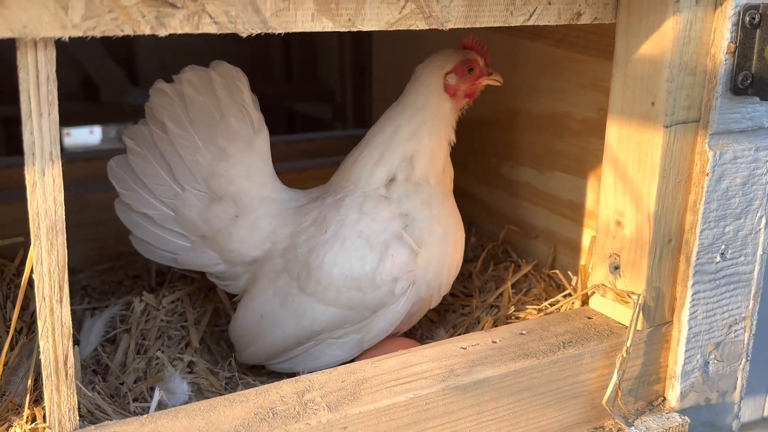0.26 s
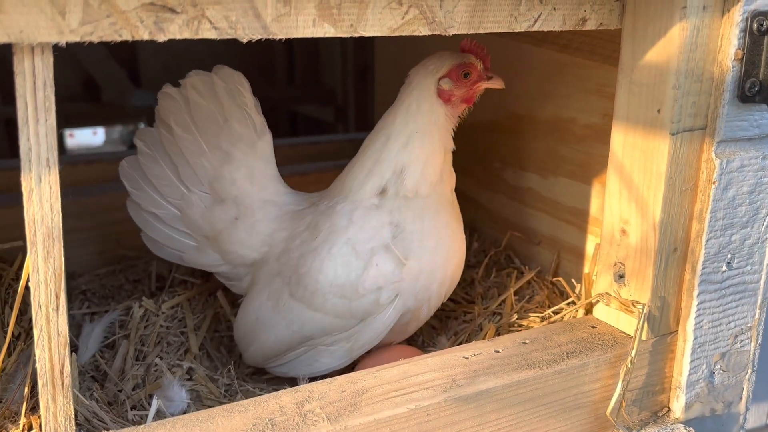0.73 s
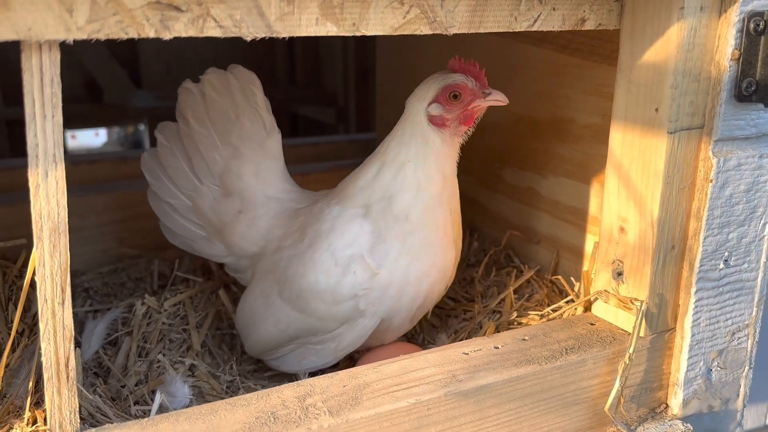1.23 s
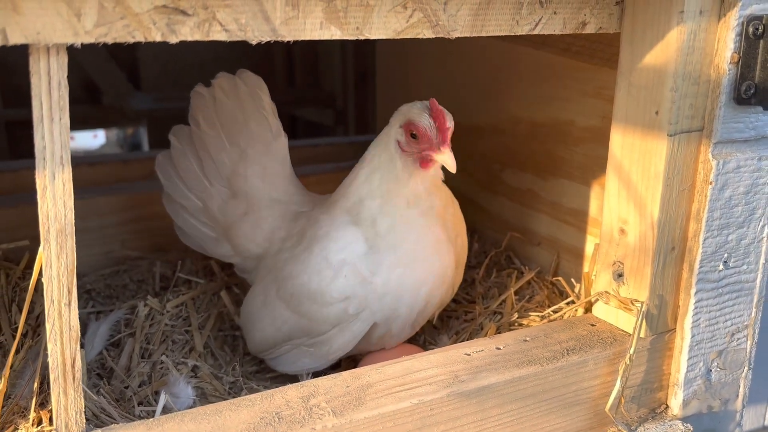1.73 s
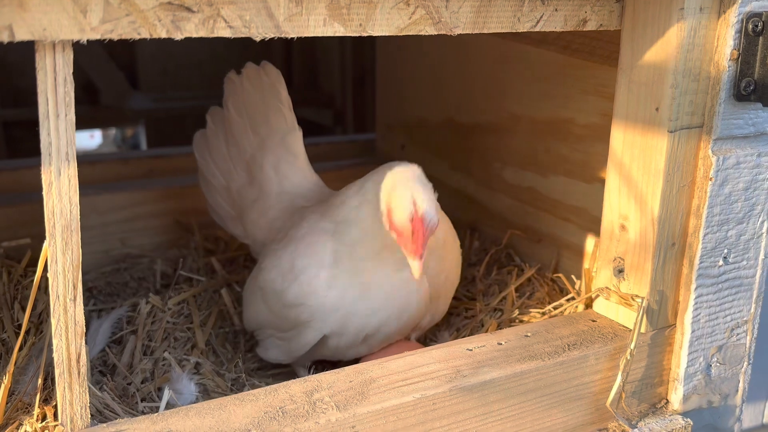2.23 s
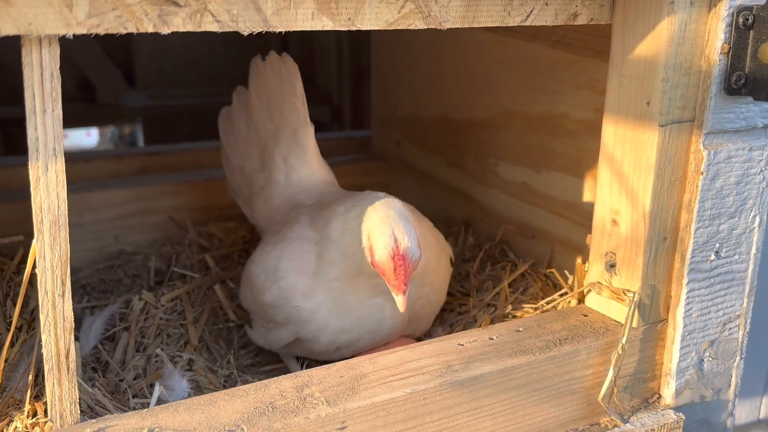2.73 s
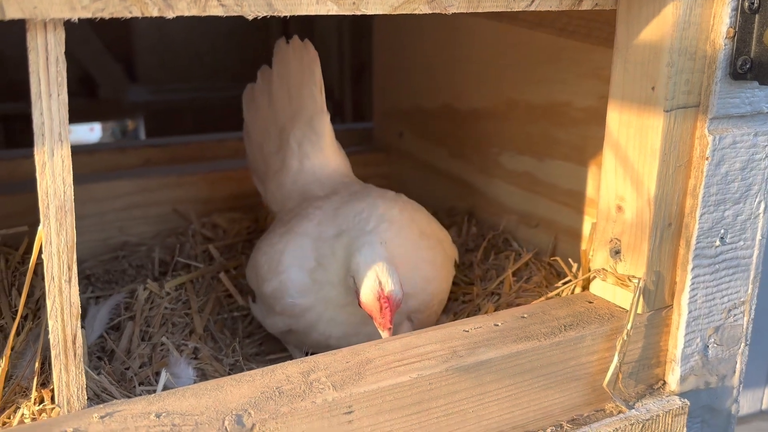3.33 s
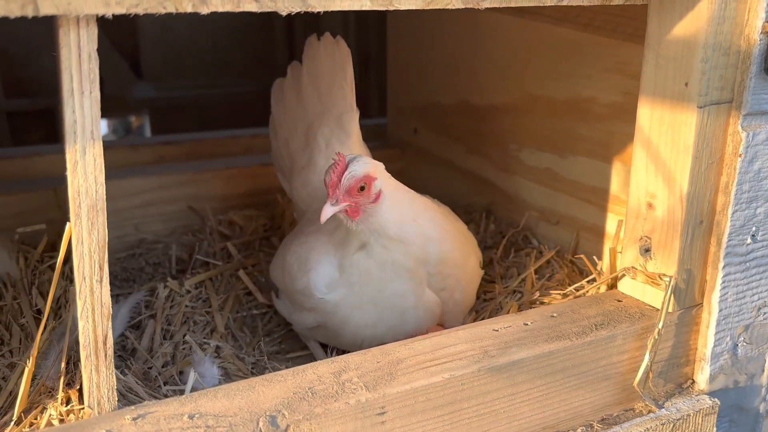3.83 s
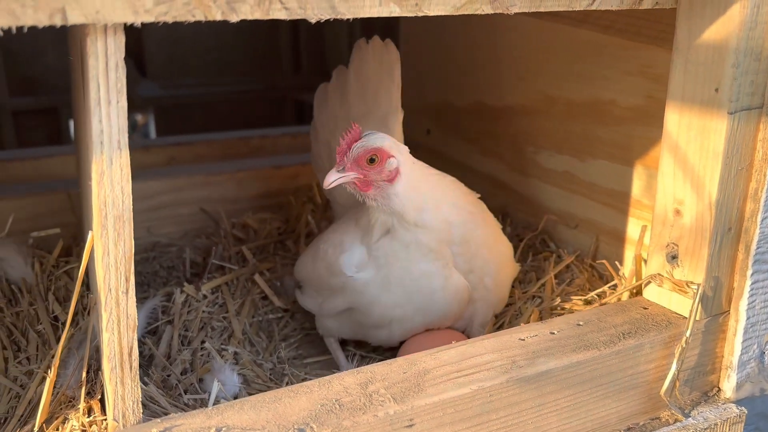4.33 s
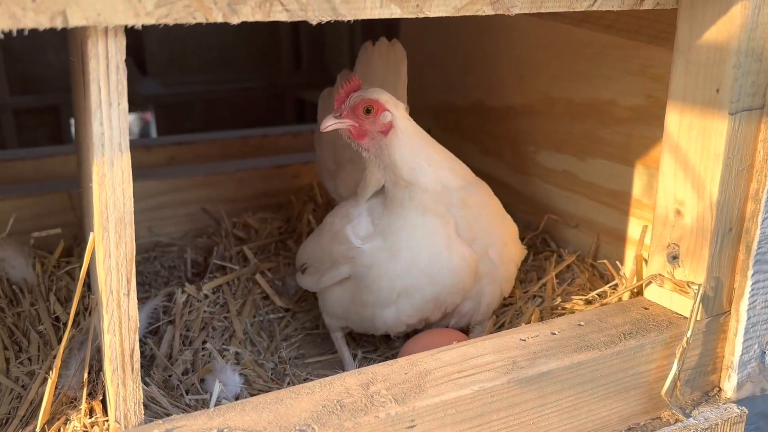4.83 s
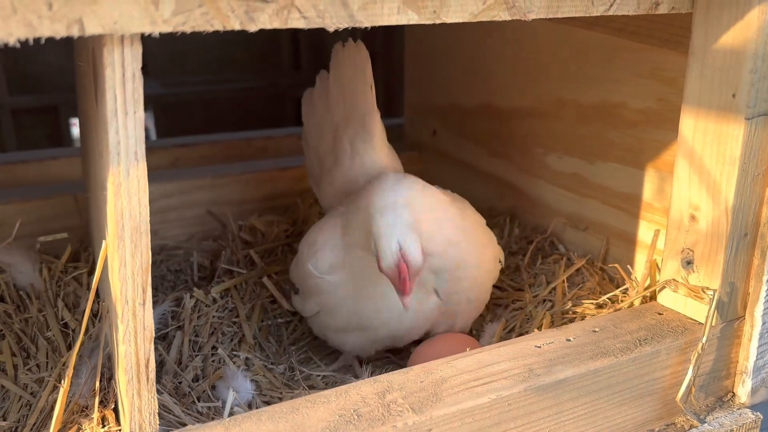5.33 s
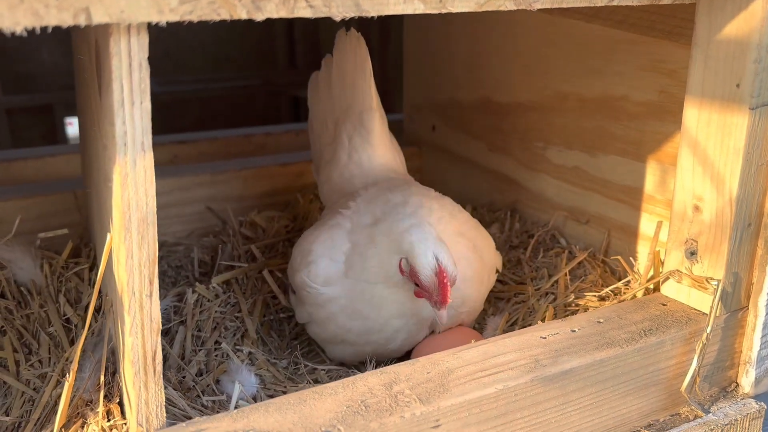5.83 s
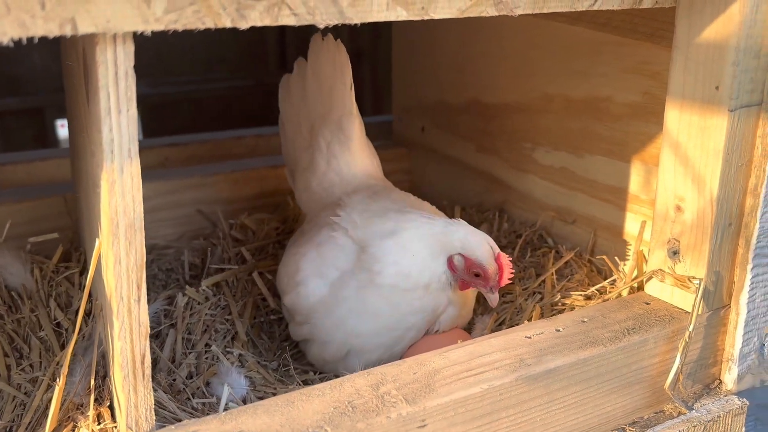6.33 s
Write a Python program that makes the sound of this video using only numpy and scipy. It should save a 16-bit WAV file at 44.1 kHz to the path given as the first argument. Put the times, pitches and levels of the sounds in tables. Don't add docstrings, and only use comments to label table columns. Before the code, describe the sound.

Close rhythmic hen clucks with two sharp ringing squawks, a second hen answering faintly from an echoing coop, then quieter, duller clucks and straw ticks.

```python
import sys
import numpy as np
from scipy import signal
from scipy.fft import rfft, irfft, next_fast_len
from scipy.io import wavfile
from scipy.ndimage import uniform_filter1d

SR = 44100
rng = np.random.default_rng(int(sys.argv[2]) if len(sys.argv) > 2 else 0)


def store_wav(level_fs):
    pcm = np.round(np.clip(np.atleast_2d(level_fs), -1, 1) * 32767)
    wavfile.write(sys.argv[1], SR, pcm.T.astype(np.int16))


def attenuation_scalar(level_db):
    decades = np.asarray(level_db, float) / 20
    return 10 ** decades


N = 289733

# time_s, effort_db, pitch_hz, beak_opening [factor on the throat], windpipe_dip_db
SQUAWK_A = [(0.813, -11, 1085, 0.92, 4.5), (0.836, -11, 1184, 1.07, 3), (0.872, -13, 1099, 1.2, 2.5),
            (.908, -16.5, 1037, 0.93, -7), (0.95, -15, 1053, 0.92, -10.5), (.98, -18, 1018, 1.16, 8.5),
            (1.0, -15, 1057, .92, -11), (1.034, -14.5, 1093, 1.22, 2.5), (1.058, -11.5, 1155, 1.1, 3)]
SQUAWK_B = [(3.886, -15.5, 1043, .96, 0.45), (3.9, -11, 1108, 0.99, 0.37), (3.931, -14.5, 1037, .93, .5),
            (3.963, -18.5, 1021, .82, .5), (3.984, -14.5, 983, 1.06, .5), (4.004, -17, 1008, .89, 0.54),
            (4.041, -14.5, 979.3, 1.045, .5), (4.078, -15, 1016, .86, 0.59),
            (4.093, -11.5, 1093, 1.067, 0.88)]
# frequency_hz, t60_s
COOP_T60 = [(300, 0.33), (1000, 0.36), (3500, 0.28), (6500, .24), (9000, 0.2), (14000, 0.13)]


def evened(x):
    return x / np.sqrt(np.mean(x ** 2) + 1e-20)


def read(points, hz):
    f, value = np.transpose(points)
    return np.interp(np.log(hz + 1), np.log(f + 1), value)


def resonance(f, centre_hz, width_hz):
    return 1 / (1 + ((f - centre_hz) / width_hz) ** 2)


def add(mix, s, sound):
    part = mix[..., round(s * SR):][..., :sound.shape[-1]]
    part += sound[..., :part.shape[-1]]


def wobble(size, width):
    *rows, length = np.atleast_1d(size)
    noise = rng.standard_normal((*rows, -(-length // 2400) * 2400))
    for _ in range(2):
        noise = uniform_filter1d(noise, round(width), axis=-1)
    return evened(noise)[..., :length]


def hiss(spectrum, same, size, patchy_db):
    hop = size // 4
    frames, hz = N // hop + 5, np.fft.rfftfreq(size, 1 / SR)
    a, b, c, d, patches = rng.standard_normal((frames, len(hz), 5)).T
    patches = evened(uniform_filter1d(uniform_filter1d(patches, 10, 0), 12, 1))
    same = np.clip(same(hz), -1, 1)[:, None]
    left = a + 1j * b
    right = same * left + np.sqrt(1 - same ** 2) * (c + 1j * d)
    z = np.array([left, right]) * attenuation_scalar(read(spectrum, hz)[:, None] + patchy_db * patches)
    return evened(signal.istft(z, nperseg=size, noverlap=size - hop)[1][:, :N])


def room(x, t60, gap_s):
    taps = np.zeros((2, SR // 2))
    slots = np.arange(round(gap_s * SR), SR // 2 - 20, 20)
    at = slots + rng.integers(0, 20, (2, len(slots)))
    np.put_along_axis(taps, at, rng.choice([-1., 1.], at.shape), 1)
    hz, t, z = signal.stft(taps, SR, nperseg=256)
    tail = signal.istft(z * attenuation_scalar(-60 * t / read(t60, hz)[:, None]), SR, nperseg=256)[1]
    return signal.fftconvolve(x[None], tail / np.linalg.norm(tail[0]), axes=1)[:, :N]


def ports(x, balance, lead):
    hz, side = np.fft.rfftfreq(x.shape[-1], 1 / SR), np.array([[.5], [-.5]])
    f, radians = np.transpose(lead)
    level = attenuation_scalar(side * read(balance, hz))
    phase = np.exp(1j * (side - .5) * np.interp(hz, f, radians))
    return irfft(rfft(x) * level * phase, x.shape[-1])


def syrinx(hz, half, rough, colour_db, bend=0.3, grain=0.):
    order = np.arange(1, 51)[:, None] / 2
    turns = np.cumsum(hz * (1 + .12 * rough * wobble(len(hz), 50.))) / SR
    between = order % 1 > 0
    gain = np.where(between, np.clip(half, 0, 1), 1.) * attenuation_scalar(colour_db(order * hz)) * (order * hz < 16300)
    rough = rough * (.7 + .12 * order + grain * order ** 2)
    shake = 1 + rough * (wobble(gain.shape, 45.) + 1j * wobble(gain.shape, 45.))
    shake = shake / (1 + 2 * rough ** 2) ** .4
    lag = bend * order ** 2 + 2 * np.pi * between * rng.random(order.shape)
    sound = (gain * shake * np.exp(2j * np.pi * order * turns - 1j * lag)).real.sum(0)
    return sound / np.sqrt((gain ** 2 * (1 + 2 * rough ** 2) ** .2).sum(0) / 2)


def outdoors():
    # frequency_hz, level_db
    air_spectrum = [(120, -16), (200, -5.5), (310, -12), (500, -9.5), (800, -3), (1250, -8), (1700, -19),
                    (2500, -24.5), (3200, -35), (4000, -33), (6000, -38), (9000, -46.5), (10500, -70),
                    (16000, -80)]
    # frequency_hz, likeness [-1 to 1]
    air_same = [(60, 1), (130, 0.13), (290, 1), (640, -0.034), (1410, -0.4), (3100, 0.29), (6820, -0.55),
                (15000, 0.48)]
    # frequency_hz, level_db
    rumble_spectrum = [(22, -42.5), (31, -26), (40, -14), (52, 8), (70, 5.5), (100, -2), (125, -5),
                       (170, -11.5), (260, -61.5)]
    # time_s, level_db
    rumble_db = [(0, -48), (1.4, -50), (2.4, -50), (3.9, -55), (4.6, -51), (5.4, -51.5), (6.57, -47)]
    # time_s, over_rumble_db
    puffs = [
        (5.671, 11.5),
        (6.038, 14.5),
        (6.209, 8),
    ]
    # frequency_hz, level_db
    hum_lines = [
        (100, -59),
        (200, -69.5),
    ]
    puff_s = 0.041
    t = np.arange(N) / SR
    air = attenuation_scalar(-51) * hiss(air_spectrum, lambda hz: read(air_same, hz), size=1024, patchy_db=.9)
    rumble = hiss(rumble_spectrum, lambda hz: .96 + 0 * hz, size=4096, patchy_db=-1.5)
    level_db = np.interp(t, *np.transpose(rumble_db))
    level_db = level_db + sum(db * np.exp(-((t - s) / puff_s) ** 2) for s, db in puffs)
    hum = sum(attenuation_scalar(db + 3.2 * wobble(N, 3000.)) * np.sqrt(2) * np.sin(2 * np.pi * hz * t) for hz, db in hum_lines)
    return air + (attenuation_scalar(level_db) * rumble + hum) * attenuation_scalar([[.4], [-.4]])


def bird():
    # start_s, length_s, top_hz, top_place [share of length], level_db
    whistles = [
        (1.72, .54, 8700, .43, -73),
        (5.16, .26, 9300, .6, -74.5),
        (5.6, .25, 7900, .3, -83),
    ]
    sag_hz_per_s2 = 17000
    dry = np.zeros(N)
    for s, length, top_hz, place, db in whistles:
        t = np.arange(0, length, 1 / SR)
        hz = top_hz - sag_hz_per_s2 * (t - place * length) ** 2
        turns = np.cumsum(hz * (1 + 0.0016 * wobble(len(t), 200.))) / SR
        level = attenuation_scalar(db + 4 * wobble(len(t), 300.)) * signal.windows.tukey(len(t), .12)
        add(dry, s, level * np.sin(2 * np.pi * turns))
    return dry + attenuation_scalar(-3) * room(dry, COOP_T60, .01)


def far_hen():
    # start_s, level_db, length_s, pitch_hz, roughness [0-1]
    calls = [(0.127, -45, .054, 965, .3), (0.312, -44, 0.046, 1104, 0.15), (0.533, -44, .04, 1012, 0.19),
             (1.162, -52.5, .05, 991, 0.48), (1.768, -55.5, 0.041, 1200, 0.21),
             (2.0, -56.5, .05, 1163, 0.27), (2.938, -50, 0.054, 1230, 0.25),
             (3.013, -42.5, .17, 1277, 0.46), (3.153, -45, 0.099, 1032, 0.37),
             (4.197, -47, 0.066, 1047, 0.17), (4.395, -43.5, .054, 1127, 0.28),
             (4.618, -44, .05, 1082, 0.22), (4.811, -44.5, 0.055, 1121, 0.33),
             (5.032, -41, .05, 1043, 0.27), (5.425, -43.5, 0.062, 954.6, 0.3)]
    # frequency_hz, height_db
    rings = [(3760, 7), (3320, 3), (4000, 3), (3970, -1), (3550, 7), (3480, 5), (3700, 7), (2550, 0),
             (2550, 7), (8500, 2), (6700, 5), (6500, 5), (4500, 8), (4000, 1.5), (3800, 4.5)]
    # frequency_hz, level_db
    short_throat = [(500, -11.5), (1100, 11.5), (2950, -17), (3300, 9.5), (3950, -0.5), (4400, -3.5),
                    (5400, -9.5), (6600, -7.5), (8500, -5.5), (10000, -19), (11300, -23), (14000, -14),
                    (16000, -13.5)]
    # frequency_hz, level_db
    wide_throat = [(500, -16), (1100, 8), (1900, -11.5), (2600, 4.5), (3100, 2), (3800, -2.5), (5200, -3),
                   (9300, -7.5), (10000, -29), (12000, -45), (16000, -57)]
    dry = np.zeros(N)
    for (s, db, length, hz, rough), (ring_hz, ring_db) in zip(calls, rings):
        u = np.arange(round(length * SR)) / (length * SR)
        throat = wide_throat if length > .08 else short_throat

        def colour_db(f):
            return read(throat, f) + ring_db * resonance(f, ring_hz, 250)
        arch = 1 - .3 * (u - .55) ** 2
        rasp = .6 * rough + .15 * np.exp(-u / .12)
        call = syrinx(hz * arch, .05 + 1.1 * rough, rasp, colour_db, grain=.05)
        rise = signal.windows.tukey(round(2 * len(u)), min(.7, .018 / length), sym=False)[:len(u)]
        shape = rise * np.cos(np.pi / 2 * u ** 3) * np.exp(-9 * length * u - .2 * u)
        add(dry, s - .011, attenuation_scalar(db + 3.5) * call * shape)
    return attenuation_scalar([[-1.5], [-4.5]]) * dry + attenuation_scalar(-5) * room(dry, COOP_T60, .006)


def straw():
    # time_s, peak_db
    ticks = [
        (3.43, -55),
        (3.651, -60),
        (5.6228, -59.5),
        (5.8624, -49),
        (5.952, -65),
        (6.0656, -47),
        (6.128, -59),
        (6.4638, -59),
    ]
    # frequency_hz, width_hz, level_db
    modes = [
        (8840, 300, -7.5),
        (14370, 2100, 4),
    ]
    t, out = np.arange(200) / SR, np.zeros(N)
    tick = sum(attenuation_scalar(db) * np.exp(-np.pi * width * t) * np.sin(2 * np.pi * hz * t) for hz, width, db in modes)
    for s, db in ticks:
        add(out, s, attenuation_scalar(db + 7) * tick)
    return out


def rustle():
    # frequency_hz, level_db
    feathers = [(2500, -19), (4000, 1.5), (8500, 14), (10000, 12.5), (14000, 10), (16000, 9)]
    start_s, rise_s, top_db, fade_db_per_s = 4.74, .11, -58, 20
    t = np.arange(N) / SR - start_s
    level = np.clip(t / rise_s, 0, 1) ** 3 * attenuation_scalar(top_db - fade_db_per_s * t + 2.5 * wobble(N, 500.))
    return level * hiss(feathers, lambda hz: 0.27 + 0 * hz, size=256, patchy_db=2)


def breath():
    # frequency_hz, under_voice_db
    breath_a = [(1500, -62), (2600, -66.5), (3600, -80), (5500, -60), (7500, -62), (9000, -49.5),
                (13500, -55.5), (16000, -61.5)]
    breath_b = [(1500, -65.5), (2600, -54), (3600, -58.5), (5500, -59.5), (7900, -85), (9000, -60.5),
                (13500, -61.5), (16000, -64)]
    t, hz, out = np.arange(N) / SR, np.fft.rfftfreq(N, 1 / SR), 0
    air = rfft(hiss([(1, 0), (2, 0)], lambda hz: .9 + 0 * hz, size=256, patchy_db=3))
    for rows, colour in (SQUAWK_A, breath_a), (SQUAWK_B, breath_b):
        s, effort_db = np.transpose(rows)[:2]
        level = attenuation_scalar(23 + np.interp(t, s, effort_db)) * (t > s[0]) * (t < s[-1])
        out = out + uniform_filter1d(level, 300) * irfft(air * attenuation_scalar(read(colour, hz)), N)
    return out


def cluck(hz, half, length, treble_db, mouth_hz, mouth_db, scoop, rasp, chest_db, early_half,
          tongue_hz, tongue_db, top_db, rise_share):
    # frequency_hz, level_db
    throat = [(280, -15.5), (440, 2.5), (900, -3.5), (1600, -1.5), (2500, -11), (3000, -14.5), (3900, 0),
              (5000, -9), (6000, -13.5), (8500, -20.5), (10000, -15), (11300, -17), (13500, -26),
              (16000, -31.5)]
    u = np.arange(round(length * SR)) / (length * SR)
    peak_place, sag_per_s = .55, 35
    before, after = np.maximum(1 - u / peak_place, 0), np.maximum(u - peak_place, 0)
    arch = 1 - scoop * before ** 2.6 - sag_per_s * max(length - .012, 0) * after ** 2
    start, end = np.exp(-(u / 0.33) ** 2), np.exp(-((1 - u) / 0.17) ** 2)
    shut = np.cos(np.pi * u) ** 4
    rough = .025 + .5 * half * (1 - half) + rasp * (start + 1.4 * end)
    uneven_db = np.linspace(1.2, 9, 50)[:, None] * wobble((50, len(u)), 350.)

    def colour_db(f):
        mouth_width_hz = 250 * (mouth_hz / 1500) ** 0.7
        db = read(throat, f) + uneven_db
        db = db + mouth_db * resonance(f, mouth_hz, mouth_width_hz) * (1 - 0.49 * shut)
        db = db + chest_db / (1 + (f / 950) ** 6)
        db = db + tongue_db * resonance(f, tongue_hz, 220)
        db = db + top_db * (f > 11500) + 5 * resonance(f, 13600, 600)
        db = db + 3.2 * shut * resonance(f, 1250, 220)
        db = db + 10 * start * resonance(f, 460, 140)
        db = db + (treble_db + 15.5 - 15 * shut - 6 * start) * np.clip((f - 2700) / 500, 0, 1)
        return db - 3 * end * np.log2(f / 800)
    rise = 1 - np.exp(-(u / rise_share) ** 1.3)
    shape = rise * (0.5 + 0.38 * np.sin(np.pi * u ** 1.24) ** 2) * (1 - np.exp((u - 1) / 0.16))
    return shape * syrinx(hz * arch, half + early_half * start, rough, colour_db, bend=0.038, grain=0.011)


def squawk(rows, throat, skull, settle_s, shift, collapse_s):
    scoop_s = .015
    s, *columns = np.transpose(rows)
    t = np.arange(s[0] - scoop_s, s[-1] + collapse_s, 1 / SR)
    early, late = np.maximum(s[0] - t, 0) / scoop_s, np.maximum(t - s[-1], 0) / collapse_s
    effort_db, hz, beak, dip_db = (np.interp(t, s, c) for c in columns)
    effort_db = effort_db - 19 * early - 17 * late ** 0.87 - 12 * late ** 8
    hz = hz * (1 - 0.28 * early - 0.42 * late ** 0.85)
    effort_db, hz, beak = uniform_filter1d([effort_db, hz, beak], 150, mode="nearest")
    hz = hz * (1 + .005 * wobble(len(t), 260.))
    rough = .009 + .2 * np.exp(-((t - t[0]) / settle_s) ** 1.5)
    rough = rough + .03 * np.exp((np.minimum(t, s[-1]) - s[-1]) / .012) + .2 * np.clip(late / .4, 0, 1)
    drift_db = np.minimum(.9 * np.sqrt(np.arange(50)), 3.5)[:, None] * wobble((50, len(t)), 650.)

    def colour_db(f):
        db = read(throat, f / (1 + shift * (beak - 1))) + drift_db
        db = db - 38.5 * (beak - 1) * resonance(f, 2100, 500)
        db = db + sum(height_db * resonance(f, at_hz, width) for at_hz, width, height_db in skull)
        db = db + 1.06 * np.maximum(effort_db + 15.5, -4) * resonance(f, 9000, 700)
        db = db + dip_db * resonance(f, 3220, 450)
        return db - (0.55 * late + .6 * early) * np.log2(f / 1000)
    voice = syrinx(hz, .005 + .7 * (rough - .009), rough, colour_db, bend=.06, grain=.06)
    return t[0], attenuation_scalar(effort_db) * voice


def hen():
    # start_s, peak_db, length_s, top_pitch_hz, strong_weak_share [0-1]
    clucks = [(0.035, -14, 0.037, 715.6, .2), (0.242, -15, 0.047, 762.5, 0.7),
              (0.467, -14.5, 0.048, 824.7, 0), (0.684, -13.5, 0.054, 834.4, 0.1),
              (0.795, -12, 0.015, 1143, 0), (1.312, -6, 0.038, 874.4, 0.12),
              (1.632, -10, 0.037, 805.3, 0.1), (1.901, -12, 0.039, 752.5, 0.52),
              (2.156, -15, 0.038, 715.5, 1), (2.39, -14.5, 0.038, 765.7, 0.2),
              (2.624, -15, 0.036, 743, 0.9), (2.88, -18, 0.036, 687.4, 0.8),
              (3.099, -20, 0.051, 827.5, .25), (3.333, -20, 0.05, 839.7, 0.24),
              (3.553, -19.5, 0.043, 802, 0.1), (3.764, -15.5, .042, 810, 0.09),
              (3.873, -10.5, 0.011, 1116, 0), (4.603, -18.5, 0.032, 615, 0.5),
              (5.311, -21.5, 0.028, 572.4, 0.22), (5.554, -19, .025, 637.7, 0.04),
              (5.948, -24, 0.0154, 560, 0.43), (6.185, -17.5, 0.027, 603.7, 0.12),
              (6.431, -17.5, 0.028, 609.3, 0.14)]
    # treble_db, mouth_hz, mouth_db, left_right_db
    heads = [(-21.5, 1500, 19, 4), (-19.5, 1300, 22, 3), (-25.5, 970, 9.5, 2), (-23, 3300, 4.5, 2.5),
             (-21.5, 1500, 12.5, 3.5), (-19, 1700, 10.5, 3), (-20.5, 1580, 12, 4.5), (-18, 1450, 15, 6),
             (-22.5, 2700, 12, 5), (-22.5, 1534, 8.5, 5), (-18, 1500, 13, 6), (-19.5, 1400, 11, 4),
             (-28, 2300, 8, 5), (-24, 2100, 13, 4.5), (-22, 1800, 2, 6), (-20.5, 3200, 13.5, 6),
             (-3.5, 1300, 26, 4.5), (-24, 1300, 18, 7), (-38.5, 2270, 4.5, 5), (-39.5, 2320, 14.5, 3.5),
             (-43, 1600, 9, 4.5), (-45.5, 1850, 3, 4.5), (-42.5, 1850, 5.5, 2.5)]
    # scoop [share of pitch], rasp [0-1], chest_db, early_strong_weak [share]
    breaks = [(0.57, 0, -0.5, 0.23), (.2, 0.3, 3.5, .5), (0.65, 0.06, -13, 0.11), (0.38, 0.4, -5, 0.11),
              (0.051, .4, -3.5, 0.22), (0.37, 0.3, -9, .05), (.45, 0.1, -5, .05), (0.68, 0.4, -3, 0.22),
              (0.9, 0, -7, 0.26), (0.15, 1, -4, 0.14), (0.61, 0.3, -4.5, .3), (0.62, 0, -3.5, 0.24),
              (.38, .4, -4, .2), (.32, .42, -4, .15), (.4, .4, -5, .15), (.4, .35, -5, .15),
              (.05, .25, -4, .05), (.25, .3, -3, .5), (0.2, 0.52, -1.5, 0.18), (0.31, 0.3, -1.5, .1),
              (0.36, 0.5, 1, .2), (0.2, 0.02, -9.5, .1), (.15, 0, -7.5, 0.084)]
    # tongue_hz, tongue_db, top_treble_db, rise [share of length]
    tongues = [(3860, 11, -1, 0.081), (1860, 3.5, -8.5, .09), (3900, 6.5, -6.5, 0.057), (1650, 4, -2.5, .1),
               (2200, 3, 0, .08), (4300, -1.5, -1, 0.095), (2420, -0.5, 2.5, 0.15), (1720, 5, 2, .1),
               (1380, 9.5, 3, .06), (2650, 7.5, -1, .12), (1880, 6.5, 1.5, 0.087), (1750, 0.5, 0, 0.09),
               (1650, -2.5, 3, 0.056), (1683, -3, 1, 0.037), (2400, 4.5, 1.5, .07), (1400, 4.5, 1.5, 0.023),
               (2100, -2.5, 0, .15), (2100, 2.5, -12, 0.036), (1790, 2, 6, 0.034), (1850, -1.5, 3, 0.081),
               (1750, -8.5, 0, 0.024), (1200, 0, -14, 0.064), (1200, -0.5, -6, 0.082)]
    # frequency_hz, level_db
    open_a = [(500, -27.5), (1070, -3.5), (2140, -5.5), (3200, -29), (4300, -16), (5350, -25), (6400, -23),
              (7500, -32.5), (8800, -27), (9700, -26.5), (10600, -20), (12800, -18), (14500, -33),
              (16300, -47.5)]
    open_b = [(500, -38), (1020, -5.5), (2040, -8), (3050, -14.5), (4080, -6), (5100, -23.5), (6100, -27),
              (7100, -19), (8100, -24), (9200, -22), (10200, -25), (11500, -12.5), (13300, -28.5),
              (15500, -26)]
    # frequency_hz, width_hz, level_db
    skull_a = [
        (7700, 400, -6),
        (9000, 280, 14),
    ]
    skull_b = [
        (7900, 300, -30),
        (9000, 300, 1),
    ]
    # (frequency_hz, left_lead_radians)
    pose_a = [
        [(60, 1.0), (110, 1.0), (200, 2.0), (380, 3.0), (700, 2.5), (1290, 3.5), (2380, 5.5), (4400, 1.0), (8120, 2.0), (15000, 0.0)],
        [(0, 0), (1210, 0.4), (1460, -1.6), (1720, 0.2), (2330, -0.2), (4130, 1.2), (4390, 0.1), (5860, 6.9), (7320, 8.1), (7920, 6.4), (10900, 3.2), (11800, 3.0), (14000, 0.2), (16400, -0.7)],
    ]
    pose_b = [
        [(60, 0.0), (110, 0.5), (200, 0.5), (380, 1.0), (700, 5.0), (1290, 6.5), (2380, 11.0), (4400, 5.0), (8120, 1.0), (15000, 0.0)],
        [(0, 0), (1290, 0.5), (1810, 5.7), (3880, 8.5), (4220, 10.6), (4570, 10.0), (6030, 13.0), (7490, 14.8), (7840, 16.5), (8530, 12.2), (10500, 9.8), (12600, 8.6), (14000, 6.2), (16400, 5.9)],
    ]
    pose_cluck = [
        [(60, 1.0), (110, 1.0), (200, 2.0), (380, 2.0), (700, 2.5), (1290, 1.5), (2380, 3.0), (4400, 3.5), (8120, 2.5), (15000, 0.0)],
        [(0, 0), (1210, 0.7), (1810, 6.7), (4220, 8.0), (6630, 0.9), (7580, 0.8), (13200, -5.5), (16400, -7.2)],
    ]
    # frequency_hz, t60_s
    box_t60 = [(300, .1), (800, .13), (1500, .085), (3000, .1), (9000, .12)]
    near, first, second = np.zeros((2, N)), np.zeros(N), np.zeros(N)
    for (s, db, length, hz, half), (*beak, pan_db), onset, tongue in zip(clucks, heads, breaks, tongues):
        sound = cluck(hz, half, length, *beak, *onset, *tongue)
        add(near, s, attenuation_scalar(db - 5.0 + (pan_db - 3.0) * np.array([[.5], [-.5]])) * sound)
    add(first, *squawk(SQUAWK_A, open_a, skull_a, settle_s=.036, shift=.15, collapse_s=.04))
    add(second, *squawk(SQUAWK_B, open_b, skull_b, settle_s=.018, shift=1, collapse_s=.034))
    direct = ports(near, *pose_cluck) + ports(first, *pose_a) + ports(second, *pose_b)
    middle, squawks = near.mean(0), first + second
    t = np.arange(SR // 5) / SR
    mode_hz, mode_t60_s, mode_db = 802, 0.097, -54.5
    mode = attenuation_scalar(mode_db - 60 * t / mode_t60_s) * np.sin(2 * np.pi * mode_hz * t)
    box_hum = signal.oaconvolve(middle, mode)[:N]
    coop = attenuation_scalar(-32) * room(middle + squawks, COOP_T60, 0.034)
    box = attenuation_scalar(-14.5) * room(middle, box_t60, .003) + attenuation_scalar(-23) * room(squawks, box_t60, .003)
    return direct + box_hum + coop + box


def scene():
    return outdoors() + bird() + far_hen() + straw() + rustle() + breath() + hen()


def band_limit(x):
    return signal.sosfilt(signal.butter(12, 16800, fs=SR, output="sos"), x)


def record(dry):
    # frequency_hz, level_db
    mic = [(9300, 0), (10300, -8), (10900, -26), (11900, -26), (12700, -4), (15600, -2), (16100, -30)]
    knee, ceiling = .72, .95
    size = next_fast_len(N + 2048)
    response = attenuation_scalar(read(mic, np.fft.rfftfreq(size, 1 / SR)))
    heard = irfft(rfft(dry, size) * response, size)[:, :N]
    straight = np.clip(heard, -knee, knee)
    heard = straight + (ceiling - knee) * np.tanh((heard - straight) / (ceiling - knee))
    return band_limit(heard)


dry = scene()
out = record(dry)
store_wav(out)
```